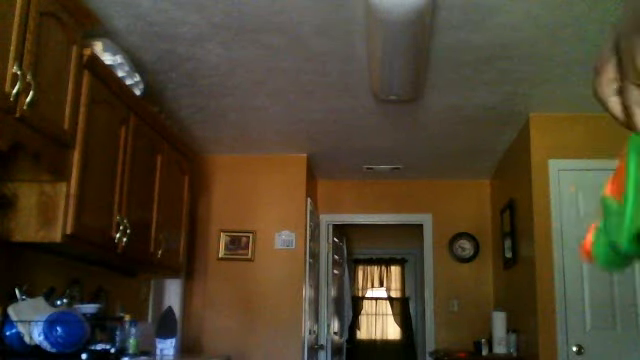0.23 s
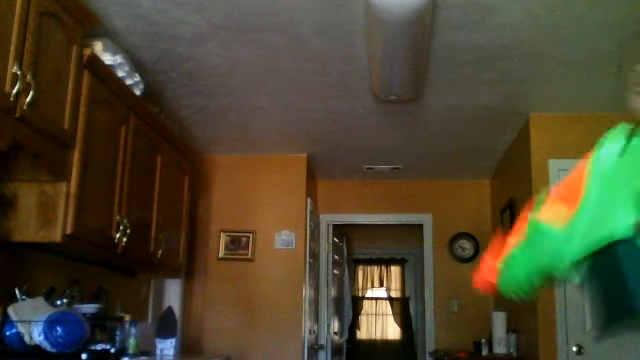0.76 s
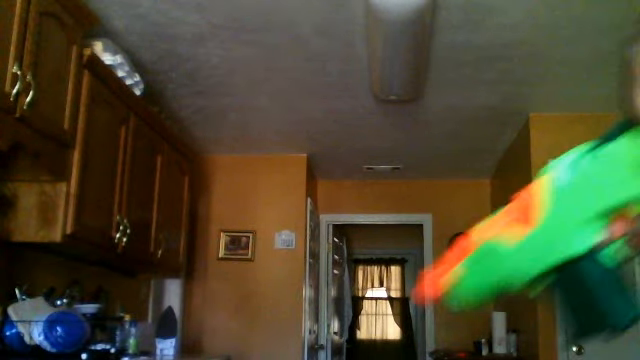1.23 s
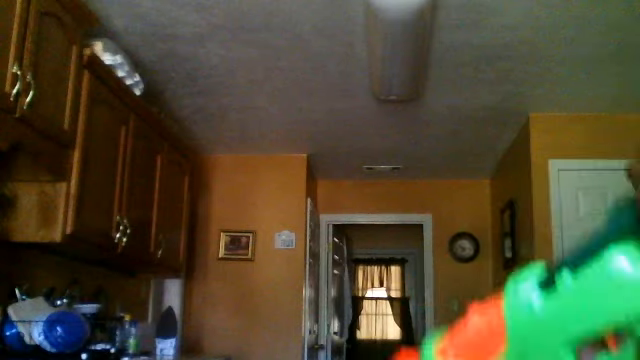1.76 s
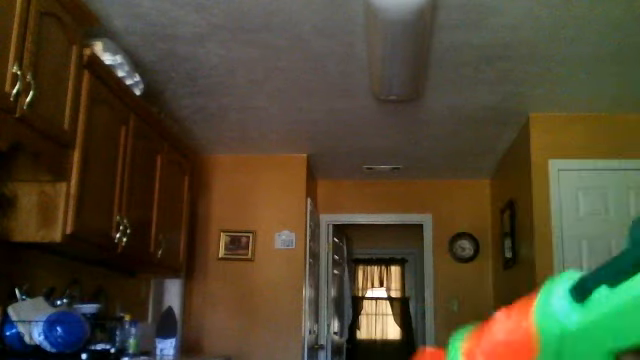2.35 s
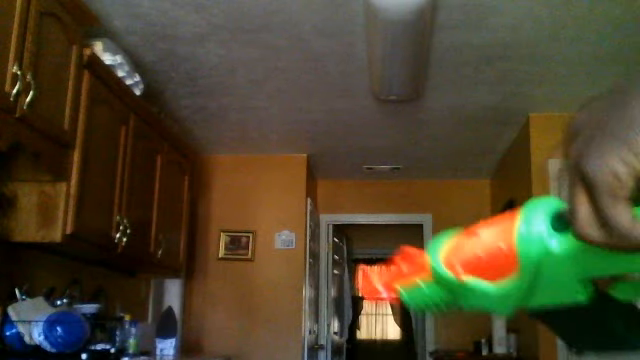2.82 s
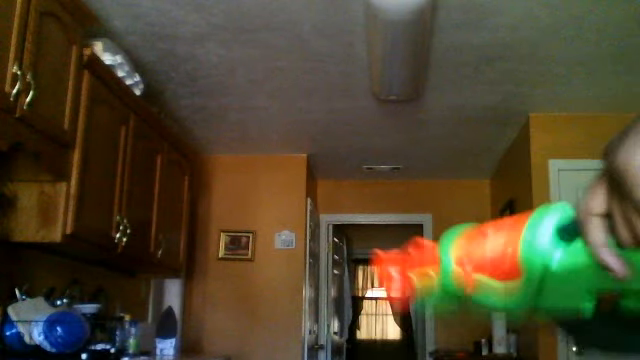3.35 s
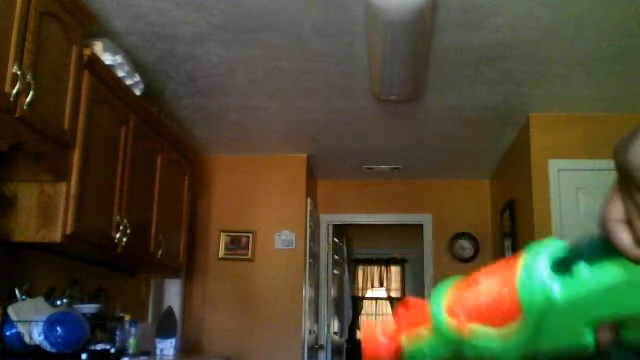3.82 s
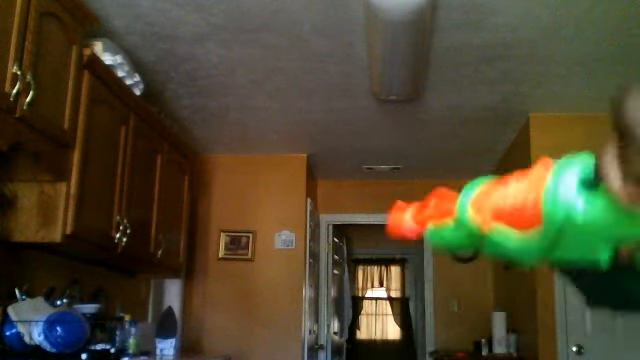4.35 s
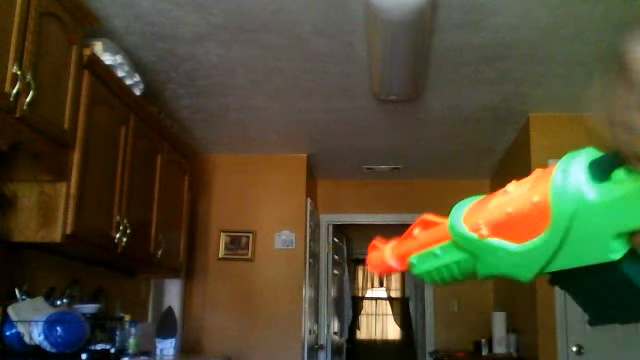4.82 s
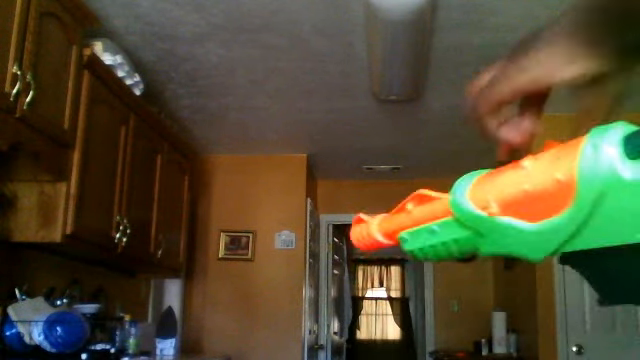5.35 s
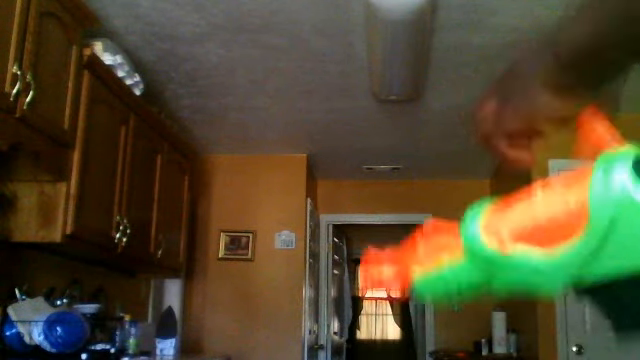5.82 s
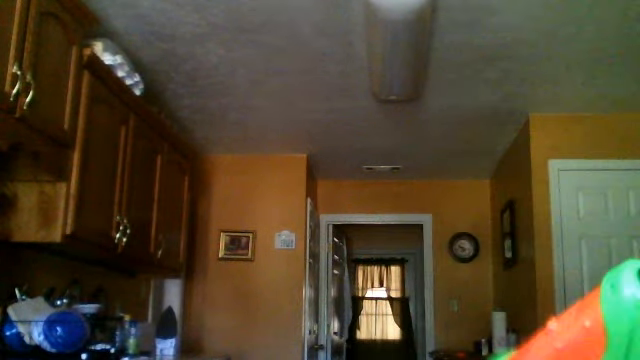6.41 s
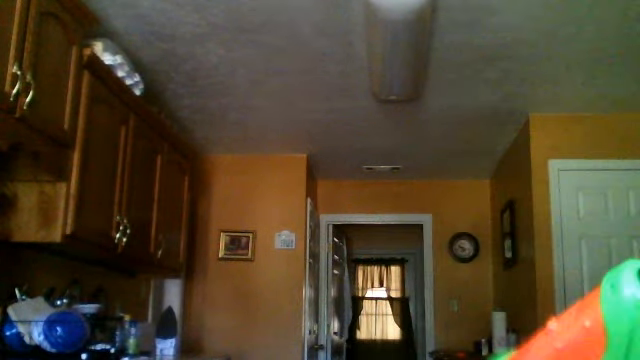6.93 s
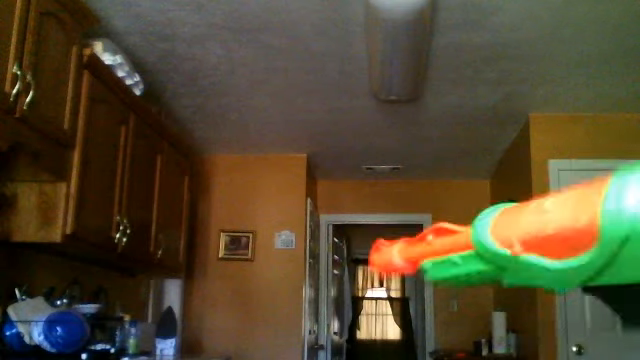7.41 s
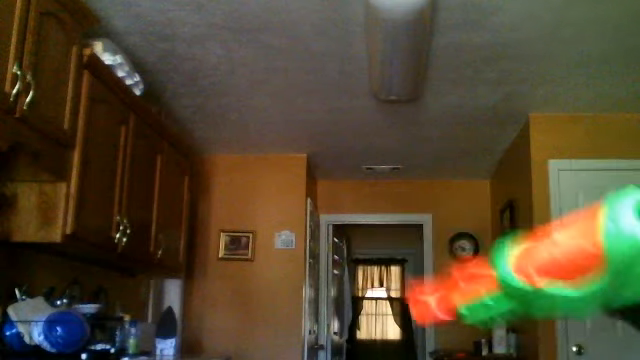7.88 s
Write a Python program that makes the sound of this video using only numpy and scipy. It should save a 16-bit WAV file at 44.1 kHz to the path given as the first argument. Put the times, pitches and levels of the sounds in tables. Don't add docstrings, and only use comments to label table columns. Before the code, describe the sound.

A hollow plastic toy blaster is handled close to a cheap webcam in a kitchen. Small ticks and a knock come first, then clacks, a firm slide-and-slam at two and a half seconds, and a very loud slam near 3.6. After a quiet gap, sharp spring ticks and rattling scrapes follow, ending in the loudest clack. Faint fan throb and hiss lie underneath; short room tails are cut off by noise gating.

```python
import sys
import numpy as np
from scipy import signal
from scipy.fft import rfft, irfft
from scipy.io import wavfile
from scipy.ndimage import uniform_filter1d

SR = 44100
rng = np.random.default_rng(int(sys.argv[2]) if len(sys.argv) > 2 else 0)


def boost_factor(decibels):
    exponent = np.asarray(decibels, float) / 20
    return 10 ** exponent


def transcribe(u):
    v = np.clip(np.atleast_2d(u).T, -1, 1)
    q = np.round(v * 32767).astype(np.int16)
    wavfile.write(sys.argv[1], SR, q)


N = 359415


def evened(x):
    return x / np.sqrt(np.mean(x ** 2) + 1e-20)


def read(points, hz):
    f, value = np.transpose(points)
    return np.interp(np.log(hz + 1), np.log(f + 1), value)


def add(mix, s, sound):
    part = mix[round(s * SR):][:len(sound)]
    part += sound[:len(part)]


def within(spans, release_s):
    t = np.arange(N) / SR
    swings = [np.interp(t, [a - .01, a, b, b + release_s], [0, 1, 1, 0]) for a, b in spans]
    return np.clip(sum(swings), 0, 1)


# f/Hz, level/dB per Hz
HISS_SPECTRUM = [(14, -31), (24, -0.5), (35, -10), (49, -45), (123, -15), (186, -27), (208, -18.5),
                 (402, -25.5), (695, -38), (933, -35), (999, -38.5), (1150, -39.5), (5500, -70.5),
                 (7150, -106), (12100, -120)]


def room_hiss():
    frames, hz = N // 512 + 5, np.fft.rfftfreq(2048, 1 / SR)
    real, imag, patches = rng.standard_normal((frames, 1025, 3)).T
    patches = evened(uniform_filter1d(uniform_filter1d(patches, 20, 0), 6, 1))
    level_db = read(HISS_SPECTRUM, hz)[:, None] + 1.3 * patches
    hiss = signal.istft((real + 1j * imag) * boost_factor(level_db), nperseg=2048, noverlap=1536)[1]
    return boost_factor(-50) * evened(hiss[:N])


# f/Hz, width/Hz, level/dB rms
FAN_LINES = [
    (17.5, 3.0, -43),
    (121.8, 6.5, -61),
    (957, 25.0, -75),
    (1116, 2.5, -77.5),
]


def fan():
    out, fine_hz = np.zeros(N), np.fft.rfftfreq(N, 1 / SR)
    for f_hz, width_hz, db in FAN_LINES:
        waver = irfft(rfft(rng.standard_normal((2, N))) * (fine_hz < width_hz), N)
        turns = np.cumsum(f_hz + 0.34 * width_hz * evened(waver[0])) / SR
        out += boost_factor(db + 3.5 + 2.0 * evened(waver[1])) * np.sin(2 * np.pi * turns)
    return out


# f/Hz, t60/s
KITCHEN_T60 = [(150, 0.25), (400, 0.27), (1000, 0.43), (2800, .42), (5500, 0.34)]


def kitchen(x):
    out, at = np.zeros(N), np.arange(250, SR - 20, 20)
    for k in range(3):
        taps = np.zeros(SR)
        taps[at + rng.integers(0, 20, len(at))] = rng.choice([-1., 1.], len(at))
        hz, t, z = signal.stft(taps, SR, nperseg=256)
        decay = boost_factor(-60 * t / read(KITCHEN_T60, hz)[:, None])
        tail = signal.istft(z * decay, SR, nperseg=256)[1]
        turn = np.sqrt(2 / 3) * np.cos(2 * np.pi * (7 * np.arange(N) / SR + k / 3))
        out += signal.fftconvolve(x * turn, tail / np.linalg.norm(tail))[:N]
    return out


# f/Hz, width/Hz, level/dB
SHELL_MODES = [(435.5, 73, 1.5), (723, 110, -7.5), (946.4, 290, 13.5), (1120, 54, -17.5), (1460, 57, -28),
               (1767, 740, 0.5), (1890, 160, -8), (2355, 540, -13), (2980, 1000, 1.5), (3390, 290, 4),
               (3800, 430, 0.5), (4350, 400, -23)]


def shell(hz, detune):
    f, width, db = np.transpose(SHELL_MODES)[:, :, None]
    f = f * detune[:, None]
    modes = boost_factor(db) * 1j * hz * width / (f ** 2 - hz ** 2 + 1j * hz * width)
    return modes.sum(0) + boost_factor(-9.5)


def rubbed_shell():
    unevenness = evened(uniform_filter1d(rng.standard_normal(N), 150))
    slips = rng.standard_normal(N) * boost_factor(2.7 * unevenness)
    return rfft(slips) * shell(np.fft.rfftfreq(N, 1 / SR), np.ones(len(SHELL_MODES))) ** 0.81


def rub(body, strokes, core_band, edge_band, dulling):
    rise_db, ceiling_db, quiet_db = 25, -31.5, -67
    hz = np.fft.rfftfreq(N, 1 / SR)

    def band(f_hz, spread):
        return evened(irfft(body * np.exp(-.5 * (np.log((hz + 1) / f_hz) / spread) ** 2), N))

    core, edge = band(*core_band), band(*edge_band)
    belly, rumble = band(402.0, 0.47), band(131.0, 0.51)
    out = np.zeros(N)
    for s, rise_s, push_db, t60, belly_db, edge_db in strokes:
        end_s = s + 0.012 + t60 * max(push_db - quiet_db, 0) / 60
        at = np.arange(round((s - rise_s) * SR), min(round(end_s * SR), N))
        since = at / SR - s
        course_db = np.where(since < 0, rise_db * since / rise_s, -60 * since / t60)
        rub_db = np.minimum(push_db + course_db, ceiling_db)
        faded_db = (rub_db - min(push_db, ceiling_db)) * (since > 0)
        top = boost_factor(edge_db + dulling * faded_db) * edge[at]
        sound = boost_factor(rub_db) * (core[at] + boost_factor(belly_db) * belly[at] + top)
        sound += boost_factor(-51 + 0.47 * (rub_db + 41.5)) * rumble[at]
        out[at] += sound * signal.windows.tukey(len(at), min(500 / len(at), 1))
    return out


# peak t/s, rise/s, push level/dB, fading t60/s, edge level/dB (3.2 kHz re 1.45 kHz)
RIM_STROKES = [(1.03, .03, -50, .2, 1), (1.495, 0.0087, -41.5, 0.059, -4.5), (6.22, 0.025, -36, 0.39, -6.5),
               (6.299, 0.16, -52.5, 0.87, 4.5), (6.708, 0.019, -30, 0.45, -16),
               (6.796, 0.045, -38.5, 0.57, 2.5), (6.962, 0.021, -46, 1, -1), (7.04, .05, -50, 0.57, -4),
               (7.116, 0.11, -52, 0.39, 0.5), (7.223, 0.069, -53.5, 0.27, -3),
               (7.433, 0.058, -37.5, 0.27, -14.5), (7.692, 0.041, -49, 0.243, -8.5),
               (7.9, 0.025, -57.5, 0.46, 4)]


def rim_rasps(body):
    strokes = [(*row[:-1], -24, row[-1]) for row in RIM_STROKES]
    return rub(body, strokes, (1450, 0.32), (3240, 0.54), dulling=.1)


# peak t/s, rise/s, push level/dB, fading t60/s, belly level/dB (400 Hz re 1.6 kHz)
SLIDE_STROKES = [(0.471, 0.005, -47, 0.67, 15), (0.544, 0.11, -30.5, 0.39, -7.5),
                 (0.789, 0.027, -67, 0.13, 13), (0.991, 0.047, -40, 0.21, 3.5),
                 (1.401, 0.047, -48, 0.19, -4), (2.2, 0.064, -43.5, 0.96, -4),
                 (2.27, 0.055, -42, 0.22, 5.5), (2.5, 0.036, -29, 0.44, 4), (3.15, 0.024, -40.5, 0.13, -5),
                 (3.199, 0.033, -39.5, 0.68, 0), (3.373, 0.12, -40, 0.38, -3),
                 (3.49, 0.12, -55.5, 0.12, -10), (3.63, 0.036, -22, 0.68, -3.5), (4.0, 0.19, -49, 0.3, 7),
                 (4.122, 0.03, -51.5, 0.11, 4.5), (5.498, 0.019, -58, 0.13, 11),
                 (5.716, 0.0096, -29.5, 0.47, -1), (5.886, 0.0092, -51.5, 0.24, -20),
                 (7.33, 0.023, -39.5, 0.55, -1.5), (7.599, 0.15, -44.5, 0.31, -0.5),
                 (7.738, 0.013, -46.5, 0.69, -2.5), (7.822, 0.013, -39, 0.21, 3),
                 (7.948, 0.028, -24, 0.16, -1.5), (8.004, 0.055, -16, 0.32, -2.5)]


def slide(body):
    strokes = [(*row, -6.5) for row in SLIDE_STROKES]
    return rub(body, strokes, (1600, 0.32), (3660, 0.34), dulling=0.84)


def rings(rows):
    out, t = np.zeros(N), np.arange(SR // 2) / SR
    for s, peak_db, f_hz, t60 in rows:
        pair = np.sin(2 * np.pi * f_hz * t) + 0.44 * np.sin(2 * np.pi * 1.13 * f_hz * t)
        add(out, s, boost_factor(peak_db - 60 * t / t60) * (1 - np.exp(-t * f_hz / 0.68)) * pair)
    return out


# t/s, peak level/dB, f/Hz
PART_PINGS = [(.278, -37, 1760), (.314, -52, 3470), (1.397, -43, 3830), (6.8, -19, 1510),
              (6.957, -33, 1450), (.987, -31, 3720), (1.493, -35.5, 3600), (2.501, -17.5, 3900),
              (2.504, -9.5, 1010), (3.146, -37, 3920), (3.631, -7.5, 826), (3.628, -13, 3900),
              (4.116, -34.5, 2260), (4.77, -52, 2260), (4.372, -37.5, 3900), (5.496, -36.5, 1673),
              (5.718, -18, 1635), (6.697, -37, 3500), (6.791, -30, 4240), (7.324, -32, 4000),
              (7.9965, -5, 896)]


def pings():
    return rings([(*row, 55 / row[-1]) for row in PART_PINGS])


# t/s, peak level/dB, f/Hz, t60/s
TUBE_BOOMS = [(0.524, -16.5, 420, 0.064), (.535, -34.5, 68, .12), (2.502, -14, 419, 0.059),
              (3.151, -40.5, 70, .1), (3.627, -11.5, 403, 0.047), (5.721, -36, 130, 0.28),
              (6.709, -20.5, 192.4, 0.16), (7.062, -36.5, 168, 0.16), (7.328, -31.5, 439, .1),
              (7.565, -28.5, 54.3, 0.12), (7.822, -30, 444, 0.04), (7.867, -34, 174, .12),
              (7.954, -32.5, 53, 0.22), (7.995, -13, 433, 0.1)]


def booms():
    return rings(TUBE_BOOMS)


def knocks(rows, part_colour):
    size, lead = 8192, 200
    thump_db, belly_db, shell_db, edge_db = part_colour
    out, t, hz = np.zeros(N), np.arange(size) / SR, np.fft.rfftfreq(size, 1 / SR)
    chance = rng.standard_normal((len(rows), 2 * size + len(SHELL_MODES)))
    for (s, peak_db, bright_db, t60), c in zip(rows, chance):
        rattle = c[:size] * boost_factor(1.3 * c[size:2 * size] - 60 * t / max(t60, .004) - 16.0)
        rattle *= 1 - np.exp(-t / 0.0035)
        rattle[60] = 1
        low_db = -0.86 * bright_db
        colour_db = read([(60, thump_db + low_db - 14.5), (150, thump_db + low_db),
                          (400, belly_db + low_db), (1000, shell_db),
                          (2000, 0), (4000, edge_db + bright_db)], hz)
        response = boost_factor(colour_db) * shell(hz, 1 + 0.013 * c[2 * size:])
        blow = irfft(rfft(np.roll(rattle, lead)) * response)
        add(out, s - lead / SR, boost_factor(peak_db) * blow / abs(blow).max())
    return out


# level/dB re 2 kHz at 150 Hz (thump), 400 Hz (belly), 1 kHz (shell), 4 kHz (edge)
SPRING_TICKS_AT = [(0.277, -41, -3, 0.0067), (0.336, -42, -11, .03), (1.492, -29.5, -4, 0.08),
                   (1.801, -57, -4, .05), (3.197, -49, 12, 0.035), (3.335, -33, -2, 0.034),
                   (4.769, -61.5, 18, 0.054), (5.715, -8, 6, .036), (5.745, -12, 0, 0.036),
                   (6.216, -16, 13.5, 0.22), (6.954, -25, -3.5, .12), (7.678, -41.5, -10, 0.084)]
SPRING_COLOUR = (-27, -9, -20.5, -26.5)


def spring_ticks():
    return knocks(SPRING_TICKS_AT, SPRING_COLOUR)


LATCH_CLICKS_AT = [(0.427, -54, 9, 0.036), (0.48, -23, -6.5, 0.092), (1.702, -50.5, 1, .045),
                   (2.428, -37.5, 9, .025), (3.281, -34.5, 9, 0.086), (3.62, -2, -5, 0.14),
                   (4.369, -23.5, 8.5, 0.032), (6.789, -18.5, -1, 0.025), (6.81, -12.5, -12, 0.025),
                   (7.322, -29, -3, 0.095), (7.59, -33, 17, 0.064), (7.796, -36, 9, .05),
                   (7.902, -25, 4, .036)]
LATCH_COLOUR = (-33.5, -15.5, -14.5, -16)


def latch_clicks():
    return knocks(LATCH_CLICKS_AT, LATCH_COLOUR)


GRIP_THUDS_AT = [(0.463, -36, -2, 0.038), (0.521, -8, 8.5, 0.082), (2.246, -19, -9, 0.061),
                 (2.544, -27.5, -6, .03), (3.554, -31.5, -0.5, 0.027), (3.979, -30, -5, 0.11),
                 (4.116, -42, 1.5, 0.047), (6.719, -10, -1.5, 0.058), (7.38, -24, 9.5, 0.11),
                 (7.427, -29, -23.5, 0.094), (7.54, -26, 7, .03), (7.737, -26.5, 17, 0.065),
                 (7.825, -23, -18, 0.036), (7.979, -7, 6.5, 0.17)]
GRIP_COLOUR = (-12.5, 4.5, -3.5, -26.5)


def grip_thuds():
    return knocks(GRIP_THUDS_AT, GRIP_COLOUR)


PLUNGER_CLACKS_AT = [(0.313, -46, 0, 0.054), (0.765, -38, -15, 0.18), (0.967, -26, -6, .05),
                     (0.986, -14, -2, 0.018), (1.395, -24.5, 5.5, 0.079), (2.188, -26, 8.5, 0.075),
                     (2.309, -40, -14, 0.047), (2.499, -5, -16.5, 0.023), (3.145, -25.5, -5, 0.056),
                     (3.357, -18, 8.5, 0.077), (3.629, -4, 9, 0.089), (3.633, -1.5, 6, 0.035),
                     (3.679, -9, 5.5, .05), (5.419, -52, 3.5, 0.079), (5.492, -34, -15, 0.13),
                     (5.886, -24.5, -10, 0.042), (6.704, -17, -2.5, 0.043), (6.745, -16, -3, 0.056),
                     (7.936, -16, 32, 0.049), (7.948, 0, 17.5, 0.06), (7.995, -1, 0, 0.056)]
PLUNGER_COLOUR = (-28, -6.5, -0.5, -20)


def plunger_clacks():
    return knocks(PLUNGER_CLACKS_AT, PLUNGER_COLOUR)


# from t/s, to t/s
TREBLE_DIPS = [
    (.66, .74),
    (1.05, 1.09),
    (2.29, 2.4),
    (2.635, 2.72),
    (3.255, 3.285),
    (3.39, 3.45),
    (7.465, 7.51),
    (7.62, 7.655),
    (7.77, 7.8),
    (7.855, 7.885),
]


def dulled(toy):
    treble = signal.sosfiltfilt(signal.butter(3, 2600, "high", fs=SR, output="sos"), toy)
    return toy - treble * (1 - boost_factor(-12.0 * within(TREBLE_DIPS, .01)))


# f/Hz, threshold level/dB per bin
BAND_THRESHOLDS = [(200, -80.5), (500, -79), (1000, -86.5), (2000, -101.5), (4000, -84.5), (4600, -87),
                   (4800, -72), (5500, -72)]


def gated(x):
    hz, t, z = signal.stft(x, SR, nperseg=1024)
    band_db = 10 * np.log10(uniform_filter1d(abs(z) ** 2, 16, 0) + 1e-20)
    shut = .5 - .5 * np.tanh((band_db - read(BAND_THRESHOLDS, hz)[:, None]) / 9.6)
    return signal.istft(z * boost_factor(-8.0 * shut), SR, nperseg=1024)[1][:N]


# from t/s, to t/s
GATE_OPEN = [(.27, .34), (.41, .43), (.46, .71), (.765, .8), (.96, 1.08), (1.385, 1.42), (1.485, 1.53),
             (2.17, 2.4), (2.42, 2.435), (2.47, 2.69), (3.135, 3.53), (3.55, 3.575), (3.595, 4.15),
             (4.36, 4.385), (5.485, 5.52), (5.7, 5.97), (6.205, 6.47), (6.69, 7.235), (7.31, 7.645),
             (7.67, 7.705), (7.735, 8.3)]


def shutter():
    return 1 - within(GATE_OPEN, 0.033)


def smeared(x):
    hz, t, z = signal.stft(x, SR, nperseg=2048, noverlap=1024)
    spread_db = -20 + read([(300, -16.5), (1500, -4.5), (4500, 4.5)], hz)
    level = np.sqrt(uniform_filter1d(abs(z) ** 2, 40, 0) + 1e-20) * boost_factor(spread_db)[:, None]
    noise = level * np.exp(2j * np.pi * rng.random(z.shape[::-1]).T)
    return x + signal.istft(noise, SR, nperseg=2048, noverlap=1024)[1][:N]


def scene():
    blows = grip_thuds() + plunger_clacks() + latch_clicks() + spring_ticks()
    ringing, shut = booms() + pings(), shutter()
    body = rubbed_shell()
    scrapes = (slide(body) + rim_rasps(body)) * boost_factor(-12.0 * shut)
    tails = kitchen(boost_factor(-3.5) * blows + boost_factor(-10.0) * ringing + boost_factor(-15.0) * scrapes) + scrapes
    toy = dulled(blows + ringing + tails * boost_factor(-11.0 * shut))
    hiss = room_hiss()
    lag = np.exp(-1 / (.12 * SR))
    afterglow = np.maximum(1 - shut, signal.lfilter([1 - lag], [1, -lag], 1 - shut))
    bright = signal.lfilter(*signal.butter(2, 2200, "high", fs=SR), hiss)
    air = hiss * boost_factor(2.5 * afterglow) + bright * afterglow * boost_factor(2.0)
    return (smeared(gated(toy)) + air + fan())[None]


def roll_off(x):
    return signal.sosfilt(signal.butter(12, 16000, fs=SR, output="sos"), x)


def record(dry):
    webcam_sr_hz, steep = 11025, ("kaiser", 10)
    lowpass = signal.firwin(1201, 5380, window=steep, fs=SR)
    kept = signal.oaconvolve(dry, lowpass[None], "same")
    mirrored = kept * np.cos(2 * np.pi * webcam_sr_hz * np.arange(N) / SR)
    bandpass = signal.firwin(601, [5600, 6050], window=steep, pass_zero=False, fs=SR)
    image = signal.oaconvolve(mirrored, bandpass[None], "same")
    clipped = np.clip(kept + boost_factor(-11.0) * image, -.7, .7)
    return roll_off(clipped)


dry = scene()
out = record(dry)
transcribe(out)
```